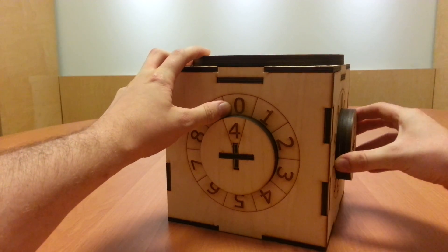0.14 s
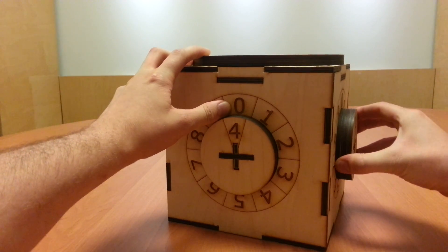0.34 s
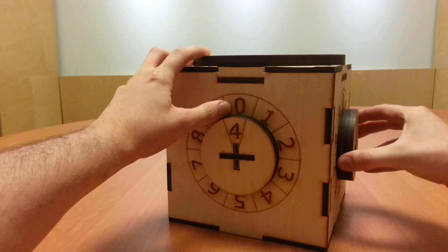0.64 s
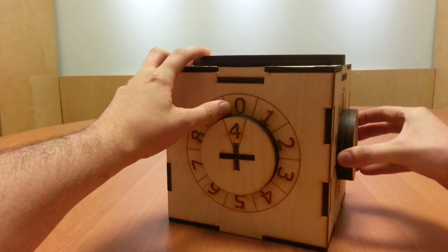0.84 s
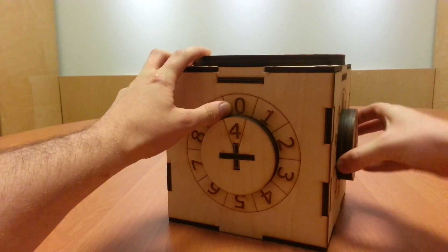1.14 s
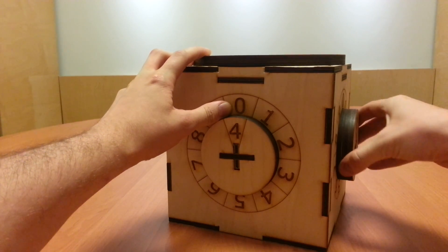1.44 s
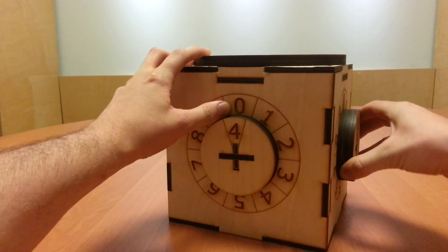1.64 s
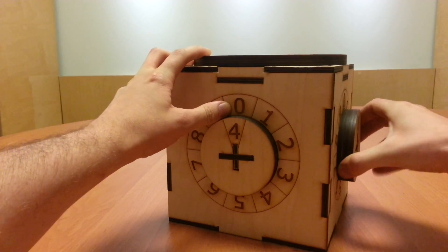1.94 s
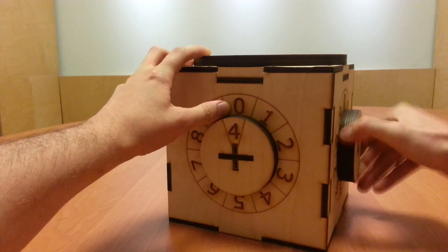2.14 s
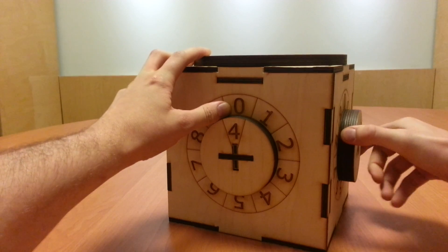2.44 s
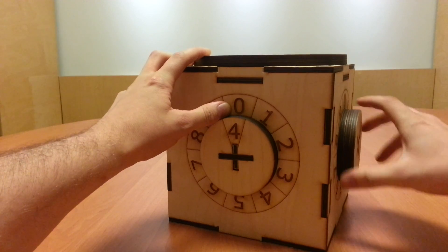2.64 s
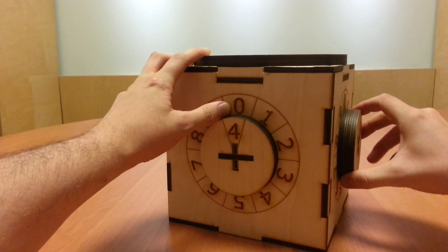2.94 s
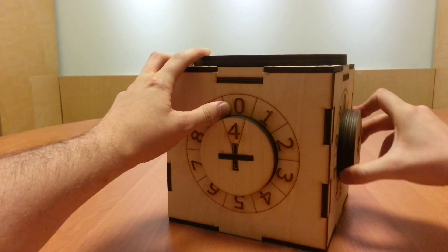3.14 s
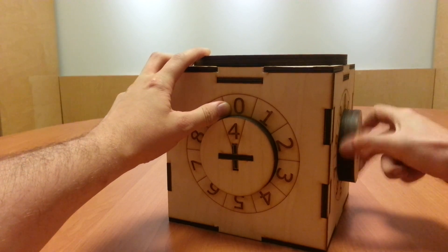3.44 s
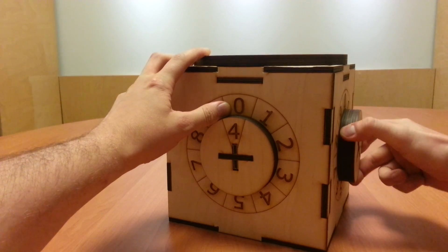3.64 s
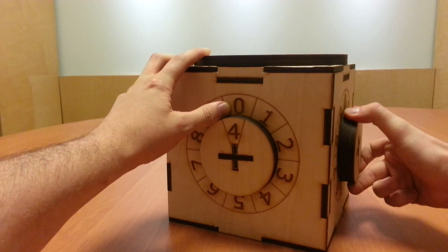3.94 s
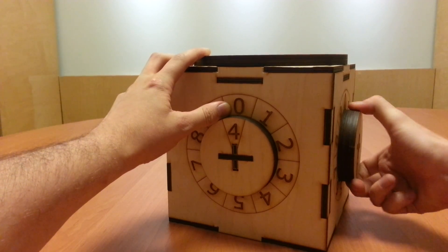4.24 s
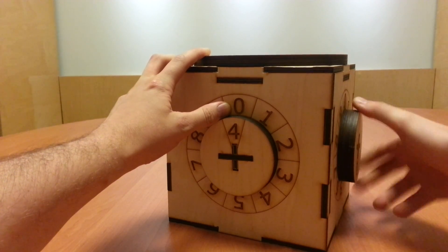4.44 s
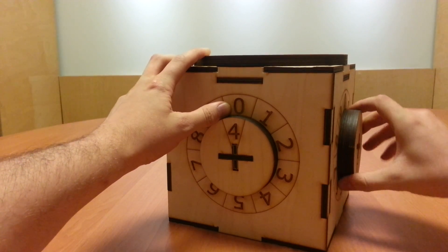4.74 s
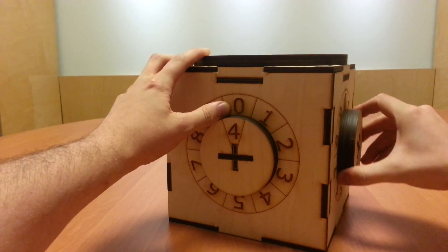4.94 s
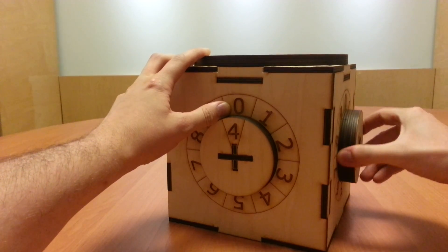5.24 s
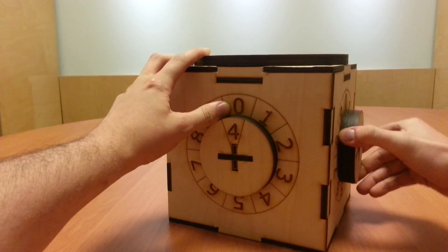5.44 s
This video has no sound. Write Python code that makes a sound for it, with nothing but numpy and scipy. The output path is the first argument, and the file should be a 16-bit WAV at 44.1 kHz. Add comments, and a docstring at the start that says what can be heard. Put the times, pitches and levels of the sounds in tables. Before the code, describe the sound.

A hand turns a loose wooden dial on a hollow plywood box. It starts with light knocks, ticks and a few tiny squeaks. A louder knock and scrape follow, then, after a pause, six short turns in uneven pairs, each a dry rasp ending in a sharp, hollow clack. The sounds are close, in a small room with a short reverberation and faint steady background noise.

```python
"""A small wooden knock, a tick and a brief squeak: a hand moves the loose dial on the side of a hollow
plywood puzzle box, on a table in a small room. Eight turns follow. In each, friction makes the disc rasp
on its seat; it speeds up, strikes a stop and drops into place, and the impacts set the panels ringing.
Between turns the disc slides a little, squeaks and rocks in its play with small knocks and ticks.
A short reverberation follows each sound, over faint steady room noise."""
import sys
import numpy as np
from scipy import signal
from scipy.fft import rfft, irfft, next_fast_len
from scipy.io import wavfile

SR = 44100
rng = np.random.default_rng(int(sys.argv[2]) if len(sys.argv) > 2 else 0)


def pcm_store(signal):
    """Save signal as 16-bit PCM."""
    levels = np.round(np.clip(np.atleast_2d(signal), -1, 1) * 32767)
    wavfile.write(sys.argv[1], SR, levels.astype(np.int16).T)


N = 246959

# Levels in the tables are relative: each source adds its own gain.
# turns of the dial: start t/s, stop t/s, drag level/dB, rush level/dB, panel load/dB re drag,
# stop level/dB, seating level/dB, struck spot f/Hz, hardness/dB, clack f/Hz,
# edge snap/dB re blow, box ring/dB re stop
TURNS = [(1.133, 1.1685, -39.5, -53, -0.5, -25.5, -47, 513, -1.5, 1100, -32, -10.5),
         (2.088, 2.2, -33, -23, -11, -15, -16.5, 400, -8, 1600, -15, -4),
         (3.08, 3.278, -44.5, -26, -6, -23, -21.5, 536, -1, 1350, -11, -1.5),
         (3.362, 3.52, -44.5, -26, -1, -26, -15.5, 432, -4.5, 940, -2.5, -9.5),
         (3.715, 3.8237, -38, -26, -26, -9, -8.5, 525, -11, 1050, -10.5, -2.5),
         (4.046, 4.2094, -41, -27, -5, -12.5, -19, 468, -3, 2220, -11.5, 3),
         (4.903, 5.0747, -39.5, -22.5, 5.5, -10.5, -7.5, 538, -8.5, 1150, -33, 0.5),
         (5.173, 5.4086, -41.5, -23.5, 5.5, -13, -9, 410, -4, 970, -32, -2)]
# the loose disc rocks against the box:
# t/s, level/dB, struck spot f/Hz, hardness/dB, clack f/Hz, box ring/dB re blow
ROCKING = [(.0334, -25, 389, -16.5, 946, -11), (0.579, -33.5, 530, 0.5, 2150, -7),
           (0.6556, -29.5, 417, -3, 950, -1), (.851, -40, 282, -17, 1060, -8),
           (1.228, -39.5, 445, 1, 1330, -19), (1.3094, -17, 360, -16, 950, -8),
           (1.35, -30, 400, -10, 960, -12), (1.4757, -31.5, 458, -18, 980, -6),
           (1.805, -50, 770, -14, 1000, -13), (1.902, -39, 563, 8, 1370, 0),
           (2.057, -8, 284, -3.5, 910, -4.5), (2.125, -20, 513, -4, 945, -22),
           (2.515, -39.5, 267, -10, 960, -9), (4.626, -52, 434, 8, 960, 9)]
# normal modes of the box and the air in it: f/Hz, level/dB, T60/s
BOX_MODES = [(109.5, -35, 0.54), (141.2, -27.5, 0.34), (183.5, -22, 0.15), (225.7, -13.5, 0.15),
             (282.4, -15, 0.26), (336.3, -16, 0.17), (404.4, -24.5, 0.4), (505.3, -16, 0.24),
             (548, -12, 0.035), (614, -21, 0.17), (835.4, -19, 0.11), (884, -22.5, 0.13),
             (998.6, -7, 0.044), (1047, -22.5, 0.069), (1219, -28, 0.16), (1947, -32, 0.21),
             (2167, -22, 0.054), (2294, -60, 0.039), (2390, -33.5, 0.084), (3276, -38, 0.24)]
# spectrum of the snap of the disc's edge: f/Hz, level/dB
SNAP_SPECTRUM = [(1200, 7.5), (3000, 8), (4500, 15), (6000, 5.5), (9500, 1.5), (14000, -26)]
# slow slides that reach no stop: start t/s, end t/s, drag level/dB, panel load/dB re drag
SLIDES = [(.072, 0.096, -51, 15.5), (0.156, .18, -43, 0), (1.217, 1.287, -48, -21),
          (1.654, 1.804, -63.5, 19.5), (5.522, 5.612, -44.5, 13)]
# spectrum of the slow drag: f/Hz, level/dB
DRAG_SPECTRUM = [(100, -36), (300, 1), (520, 9), (740, -8), (1000, 7), (1400, -3.5), (2400, -4.5),
                 (3400, -4), (4600, -4), (6200, -7), (10000, -12), (14000, -30)]
# brighter spectrum of the rush, the fast sliding at the end of a turn: f/Hz, level/dB
RUSH_SPECTRUM = [(150, 1), (500, -4.5), (1000, 9), (1500, -5), (2300, -1), (3400, -1.5), (4600, -0.5),
                 (6200, -8.5), (10000, -9), (14000, -25)]
# the disc chatters on its seat: peak t/s, level/dB
SQUEAKS = [(0.178, -28.5), (1.162, -31), (1.23, -35.5), (1.284, -40)]
# resonances of the squeaking disc: f/Hz, bandwidth/Hz, level/dB
DISC_MODES = [(849.4, 36.4, 3), (1050, 78, -4), (2740, 307, -7), (4450, 170, -6), (5240, 510, -10)]
# an edge catches with a dry tick: t/s, level/dB
TICKS = [(.09, -33.5), (1.7049, -31), (1.748, -53), (2.1119, -19), (2.244, -33), (4.051, -42)]
# reverberation time of the room: f/Hz, T60/s
ROOM_T60 = [(120, 0.35), (700, 0.32), (2000, 0.36), (5000, 0.28), (12000, 0.24)]
# frequency weighting of the reverberation: f/Hz, level/dB
ROOM_SPECTRUM = [(50, -66), (130, -8.5), (400, -2.5), (1000, 1.5), (2500, 5), (6000, 2), (14000, 1)]
# spectrum of the steady room noise: f/Hz, level/dB
NOISE_SPECTRUM = [(15, -42), (25, -20), (81, -16), (111, -3.5), (189, -3), (282, -2.5), (368, -3.5),
                  (480, -6), (594, -11.5), (818, -5.5), (1320, -12), (3100, -16), (6700, -23), (14500, -22)]

OVERRUN_S, SEATING_S = 0.0088, 0.0155  # after the stop the disc scrapes on, then drops into its seat
REBOUND_S = 0.012  # the rocking disc bounces once, this long after its knock


def knocks(thud_db=8, box_db=5, wood_db=3, edge_db=2, thud_t60=0.032, clack_t60=0.02, snap_t60=0.0089,
           clack_width=0.66, contact_s=0.0018, edge_s=0.000067, spread_s=0.0041):
    """Impact excitation: the struck spot thuds, the box rings, the disc clacks and its edge snaps."""
    out, t = np.zeros(N), np.arange(SR * 2 // 5) / SR
    for s, db, hz, hardness_db, clack_hz, ring_db, snap_db in blows():
        thud = -np.sin(2 * np.pi * hz * t) * fade(t, thud_t60) * (1 - np.exp(-t / contact_s))
        # the blow takes a few milliseconds to spread through the panels
        ring = box_ring(t) * (1 - np.exp(-t / spread_s))
        # the disc's modes are dense and short: noise in a broad resonance, louder for a harder contact
        clack = resonance(rng.standard_normal(len(t)), clack_hz, clack_width * clack_hz)
        clack = butterworth(clack * fade(t, clack_t60), 2, 1.92 * clack_hz, "low")
        snap = unit(colour(rng.standard_normal(len(t)), SNAP_SPECTRUM)) * fade(t, snap_t60)
        hard = undb(wood_db + hardness_db) * clack + undb(edge_db + snap_db) * snap
        hard *= 1 - np.exp(-t / edge_s)
        add(out, s, undb(db) * (undb(thud_db) * thud + undb(box_db + ring_db) * ring + hard))
    return out


def blows(seat_hardness_db=1.5, seat_ring_db=-2, rock_snap_db=-17, rebound_db=-15):
    """Collisions come in pairs: stop and seating in a turn, knock and rebound when the disc rocks."""
    for _, stop, _, _, _, stop_db, seat_db, hz, hardness_db, clack_hz, snap_db, ring_db in TURNS:
        yield stop, stop_db, hz, hardness_db, clack_hz, ring_db, snap_db
        seated = stop + SEATING_S
        yield seated, seat_db, hz, hardness_db + seat_hardness_db, clack_hz, seat_ring_db, snap_db
    for s, db, *contact in ROCKING:
        yield s, db, *contact, rock_snap_db
        yield s + REBOUND_S, db + rebound_db, *contact, rock_snap_db


def box_ring(t, scatter_db=5.0, detune=0.0085):
    """Superposition of damped modes: the contact point sets their shares, the grip detunes them."""
    hz, db, t60 = np.transpose(BOX_MODES)
    share, shift = rng.standard_normal((2, len(hz)))
    gain = (-1) ** np.arange(len(hz)) * undb(db + scatter_db * share)
    hz = hz * (1 + detune * shift)
    return gain @ (np.sin(2 * np.pi * hz[:, None] * t) * fade(t, t60[:, None]))


def cracks(crack_db=8, t60=0.0073, band_hz=(1500, 7500)):
    """Sudden deceleration at stop and seat draws a crack from the wood, in proportion to the rush."""
    out, t = np.zeros(N), np.arange(SR // 20) / SR
    for _, stop, _, rush_db, *_ in TURNS:
        for s in (stop, stop + SEATING_S):
            burst = unit(butterworth(rng.standard_normal(len(t)), 3, band_hz, "band"))
            add(out, s, undb(rush_db + crack_db) * burst * fade(t, t60))
    return out


def rubbing(grain_db=2.5, slip_db=2.5, slips_per_s=110, friction_db=-1, panel_db=-8, panel_hz=950):
    """Sliding friction: wood fibres catch and slip in dense tiny clicks that also drive the panels."""
    t = np.arange(N) / SR
    fibres = rng.standard_normal(N) * undb(grain_db * rng.exponential(size=N))
    slips = np.interp(t * slips_per_s, np.arange(N), rng.standard_normal(N))
    fibres = unit(fibres) * undb(slip_db * slips)
    drag, rush, load = motion(t)
    # the drag bows the panels, mostly their low modes
    ring = butterworth(box_ring(t[:SR // 2]), 2, panel_hz, "low")
    panels = signal.fftconvolve(fibres * load, ring / np.linalg.norm(ring))[:N]
    slow = unit(colour(fibres, DRAG_SPECTRUM)) * drag
    fast = unit(colour(fibres, RUSH_SPECTRUM)) * rush
    return undb(friction_db) * (slow + fast) + undb(panel_db) * panels


def motion(t, swell_db_per_s=27.5, rush_rise_s=0.01, haste=0.29):
    """Friction noise grows with speed: envelopes of the slow drag, the final rush and the panel load."""
    drag, rush, load = np.zeros((3, N))
    for start, stop, drag_db, rush_db, load_db, stop_db, *_ in TURNS:
        end = stop + OVERRUN_S
        gate, remaining_s = moving(t, start, end), np.maximum(end - t, 0)
        drag += gate * undb(drag_db - swell_db_per_s * remaining_s)
        load += gate * undb(drag_db + load_db)
        rise_s = rush_rise_s / undb(haste * stop_db)  # a stronger knock ends a briefer rush
        rush += gate * undb(rush_db) * np.exp(-remaining_s / rise_s)
    for start, end, drag_db, load_db in SLIDES:
        pull = moving(t, start, end) * undb(drag_db)
        drag += pull
        load += pull * undb(load_db)
    return drag, rush, load


def moving(t, start, end, grip_s=0.0081, halt_s=0.0037):
    """Gate of the disc's motion: a linear rise to 1, then a quick exponential halt."""
    return np.clip((t - start) / grip_s, 0, 1) * np.exp(-np.maximum(t - end, 0) / halt_s)


def squeaks(rise_s=0.0088, fall_s=0.0035):
    """Stick-slip vibration: under the fingers' grip the disc chatters briefly on its own resonances."""
    t, tone = np.arange(N) / SR, 0
    for hz, width_hz, mode_db in DISC_MODES:
        # a random walk of the phase broadens the line to its bandwidth
        slip = np.cumsum(rng.standard_normal(N)) * np.sqrt(2 * np.pi * width_hz / SR)
        tone = tone + undb(mode_db) * np.sin(2 * np.pi * hz * t + slip)
    swell = sum(undb(db) * np.exp(np.minimum((t - s) / rise_s, (s - t) / fall_s)) for s, db in SQUEAKS)
    return unit(tone) * swell


def taps(settle_s=0.12, settle_db=-11, rise_s=0.00068, spot_hz=420, detune=0.12, count=3):
    """Soft contacts excite little treble: the rocking disc settles in dull, heavily damped pulses."""
    out, t = np.zeros(N), np.arange(SR // 20) / SR
    touch = t / rise_s * np.exp(1 - t / rise_s)
    for s, db, *_ in ROCKING:
        for when, size, shift in rng.random((count, 3)):
            tone = np.sin(2 * np.pi * spot_hz * (1 + detune * (2 * shift - 1)) * t)
            add(out, s + REBOUND_S + settle_s * when, undb(db + settle_db) * (.5 + size) * tone * touch)
    return out


def ticks(t60=0.006, band_hz=(3800, 11500)):
    """Brief hard contacts radiate treble; these are too light to move the panels."""
    out, t = np.zeros(N), np.arange(SR // 20) / SR
    for s, db in TICKS:
        burst = unit(butterworth(rng.standard_normal(len(t)), 2, band_hz, "band"))
        add(out, s, undb(db) * burst * fade(t, t60))
    return out


def reverberation(x, wet_db, delay_s=0.00077, frame_size=384):
    """Energy balance of a diffuse field: each band stores the sound's energy and loses it exponentially."""
    hop = frame_size // 4
    frames = dict(fs=SR, nperseg=frame_size, noverlap=frame_size - hop)
    delayed = np.pad(x, (int(delay_s * SR), 0))[:N]
    hz, _, source = signal.stft(delayed, **frames)
    retained = fade(hop / SR, lookup(ROOM_T60, hz)) ** 2  # share of the energy left after one hop
    stored = [signal.lfilter([1 - k], [1, -k], abs(band) ** 2) for k, band in zip(retained, source)]
    field = signal.stft(diffuse(N), **frames)[2]
    field = field / np.sqrt(np.mean(abs(field) ** 2))
    gain = undb(wet_db + lookup(ROOM_SPECTRUM, hz))[:, None]
    return signal.istft(field * gain * np.sqrt(stored), **frames)[1][:, :N]


def room_noise(level_db=-51.5):
    """Stationary diffuse noise: the room's faint rumble and hiss."""
    return undb(level_db) * unit(colour(diffuse(N), NOISE_SPECTRUM))


def diffuse(n, spacing_m=0.16, sound_m_per_s=343):
    """Spatial coherence: noise from all sides is alike at two points in the bass, unrelated in treble."""
    coherence = .98 * np.sinc(2 * np.fft.rfftfreq(n, 1 / SR) * spacing_m / sound_m_per_s)
    mid, side = rfft(rng.standard_normal((2, n))) * np.sqrt([(1 + coherence) / 2, (1 - coherence) / 2])
    return irfft([mid + side, mid - side], n)


def resonance(x, hz, width_hz):
    """Forced response of one damped resonator, at rms 1."""
    return unit(signal.lfilter(*signal.iirpeak(hz, hz / width_hz, fs=SR), x))


def butterworth(x, order, hz, kind):
    """Maximally flat low-, high- or band-pass filtering."""
    return signal.sosfilt(signal.butter(order, hz, kind, fs=SR, output="sos"), x)


def colour(x, points):
    """Spectral weighting by (f/Hz, level/dB) points."""
    n = next_fast_len(x.shape[-1])
    gain = undb(lookup(points, np.fft.rfftfreq(n, 1 / SR)))
    return irfft(rfft(x, n) * gain, n)[..., :x.shape[-1]]


def lookup(points, hz):
    """Interpolation of (f/Hz, value) points on a log-frequency axis."""
    f, value = np.transpose(points)
    return np.interp(np.log(hz + 1), np.log(f), value)


def fade(t, t60):
    """Exponential decay, 60 dB down after t60."""
    return np.exp(-np.log(1000) * t / t60)


def undb(db):
    """Decibels to amplitude ratio."""
    return 10 ** (np.asarray(db) / 20)


def unit(x):
    """Normalisation to rms 1."""
    return x / np.sqrt(np.mean(x ** 2))


def add(track, s, sound):
    """Superposition of a sound on the track at time s."""
    i = int(np.clip(s * SR, 0, N - 1))
    track[i:i + len(sound)] += sound[:N - i]


def scene(left_db=0.75, lag_samples=3, wet_db=-2, rub_wet_db=2, tick_wet_db=-5, box_hz=88, rumble_hz=82):
    """Direct plus diffuse field: the box stands slightly left, so that side is earlier and louder."""
    # a small box radiates little deep bass
    hits = butterworth(knocks() + taps(), 4, box_hz, "high")
    rub = butterworth(rubbing() + squeaks(), 4, box_hz, "high")
    clicks = ticks() + cracks()
    near = hits + rub + clicks
    direct = np.array([near, np.pad(near, (lag_samples, 0))[:N]])
    # the rubbing side faces away, so more of its sound arrives by the room
    into_room = hits + undb(rub_wet_db) * rub + undb(tick_wet_db) * clicks
    # deep bass rumble is filtered out of the reverberation
    reverb = butterworth(reverberation(into_room, wet_db), 4, rumble_hz, "high")
    return (direct + reverb) * undb([[left_db], [-left_db]]) + room_noise()


def record(dry, bottom_hz=25, top_hz=14550):
    """Band limiting: the deep bass is thinned and the top is cut steeply."""
    x = butterworth(dry, 2, bottom_hz, "high")
    return signal.sosfilt(signal.ellip(10, .2, 80, top_hz, fs=SR, output="sos"), x)


dry = scene()
out = record(dry)
pcm_store(out)
```